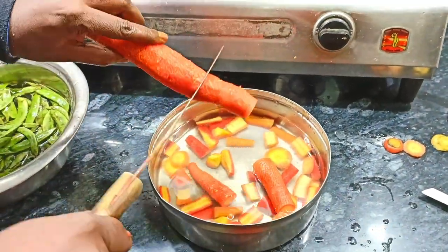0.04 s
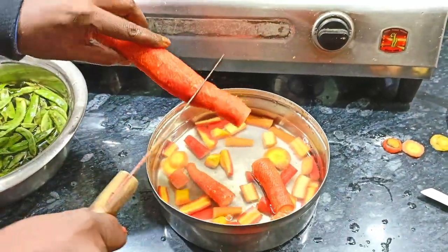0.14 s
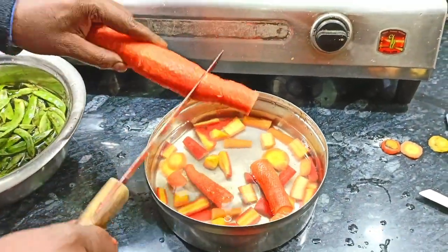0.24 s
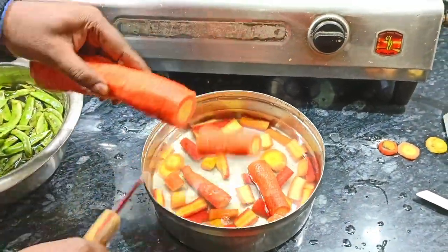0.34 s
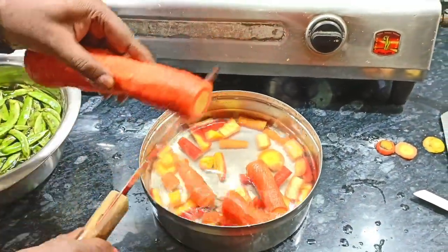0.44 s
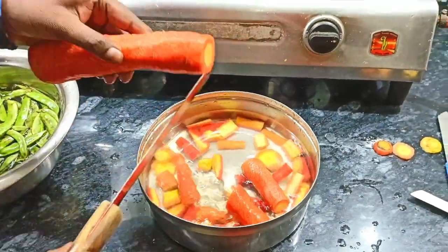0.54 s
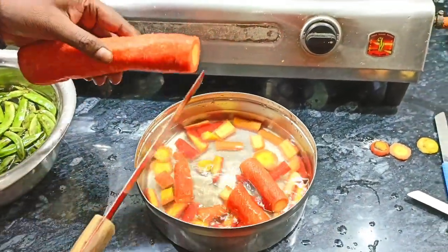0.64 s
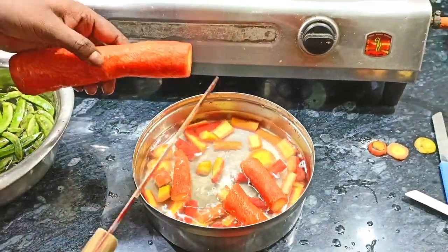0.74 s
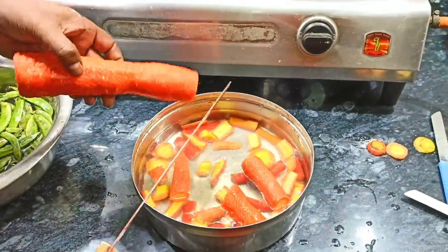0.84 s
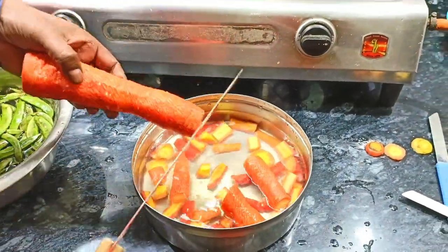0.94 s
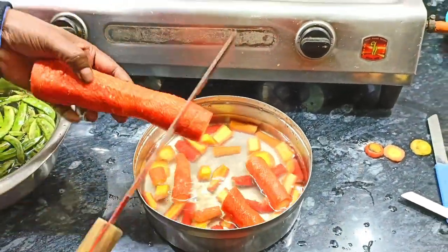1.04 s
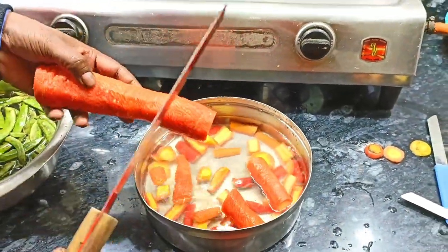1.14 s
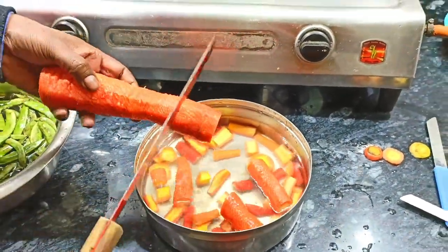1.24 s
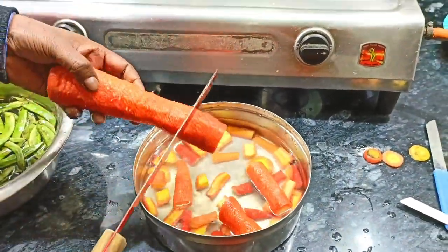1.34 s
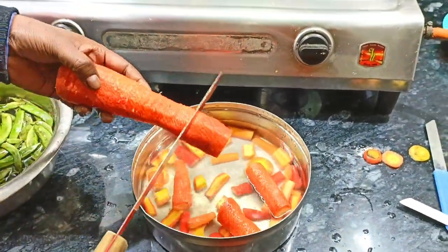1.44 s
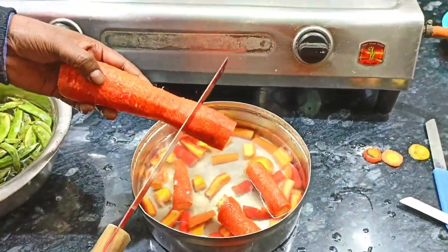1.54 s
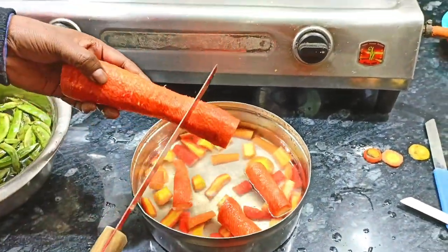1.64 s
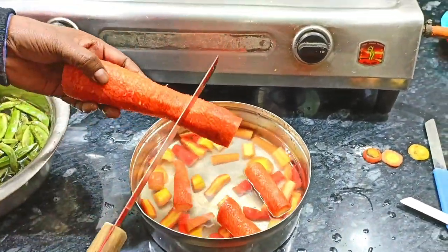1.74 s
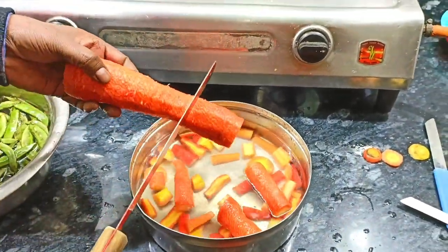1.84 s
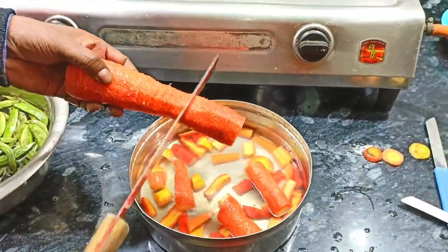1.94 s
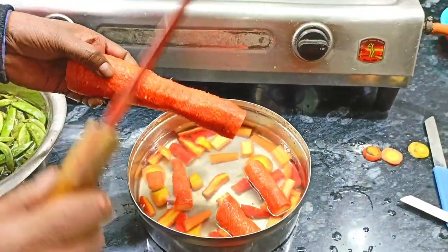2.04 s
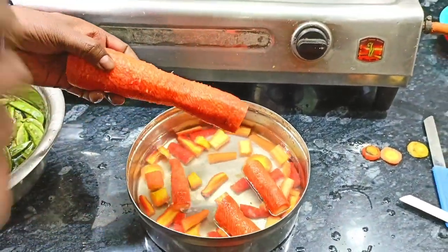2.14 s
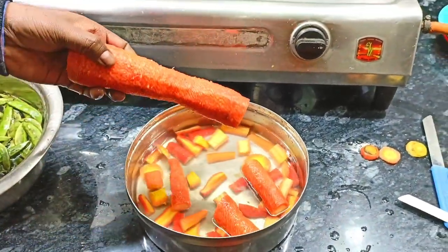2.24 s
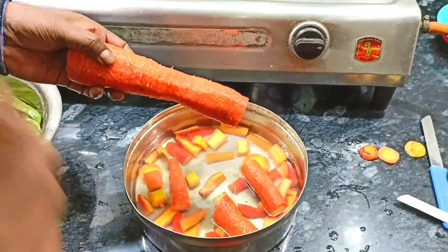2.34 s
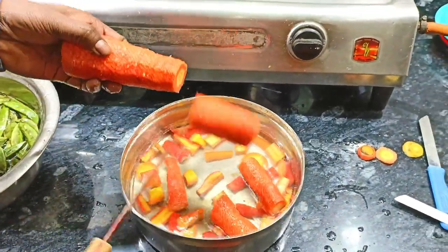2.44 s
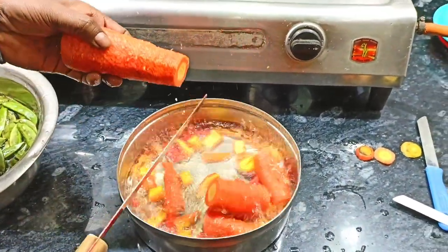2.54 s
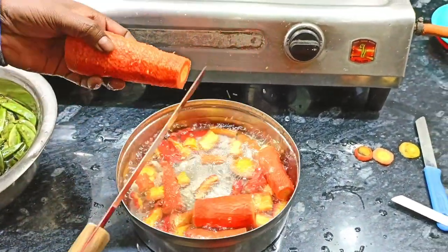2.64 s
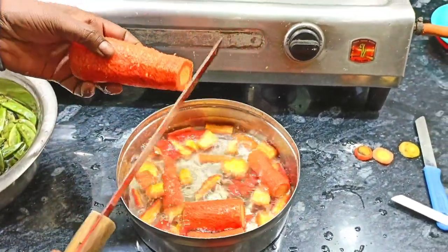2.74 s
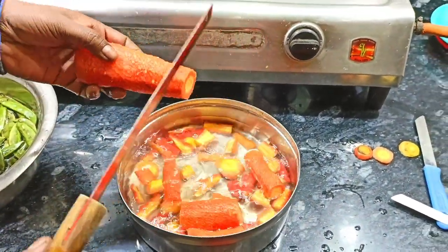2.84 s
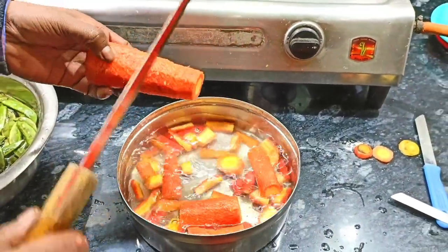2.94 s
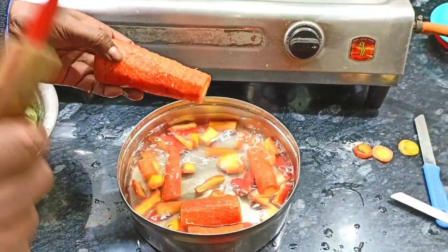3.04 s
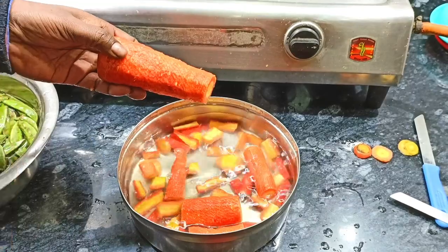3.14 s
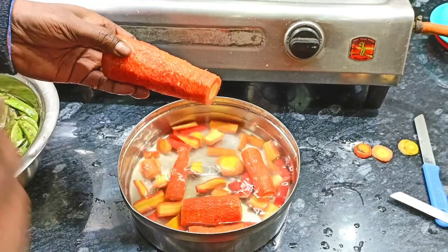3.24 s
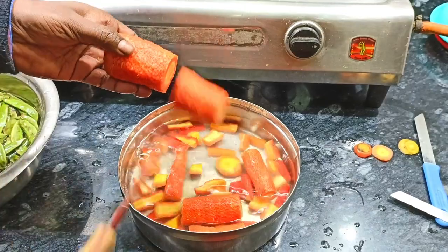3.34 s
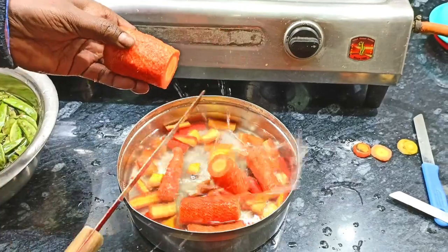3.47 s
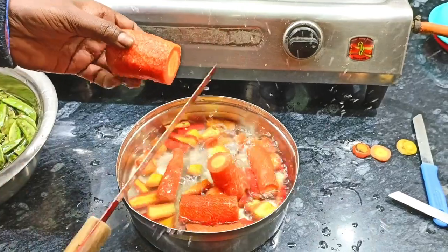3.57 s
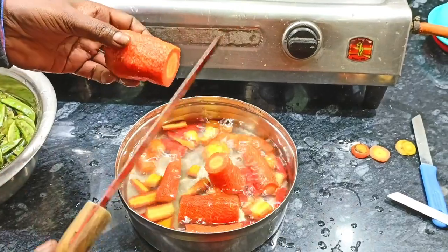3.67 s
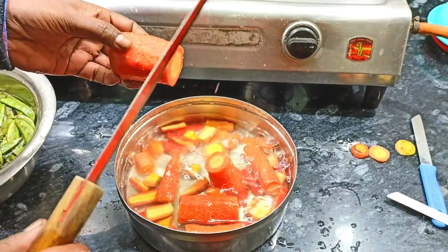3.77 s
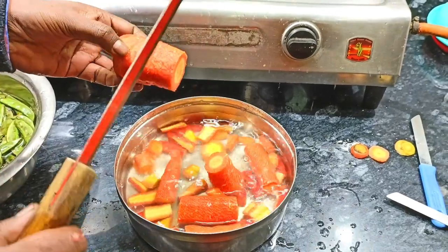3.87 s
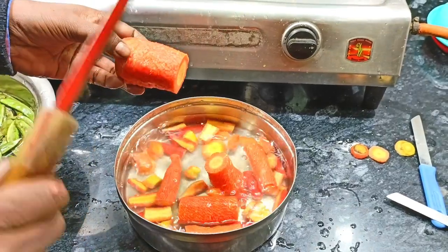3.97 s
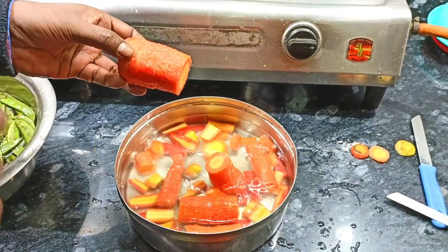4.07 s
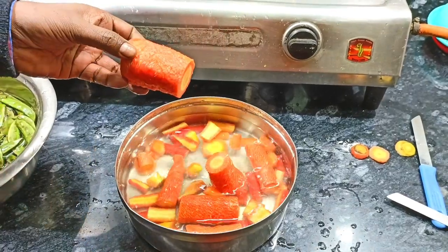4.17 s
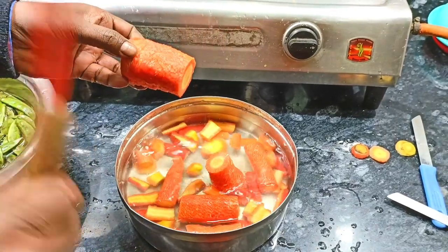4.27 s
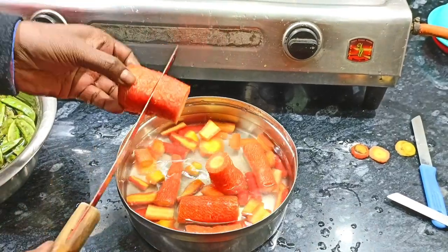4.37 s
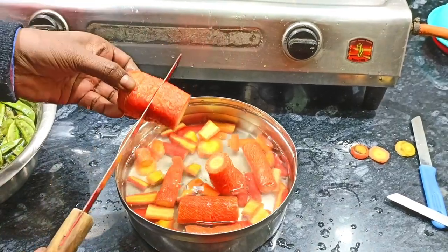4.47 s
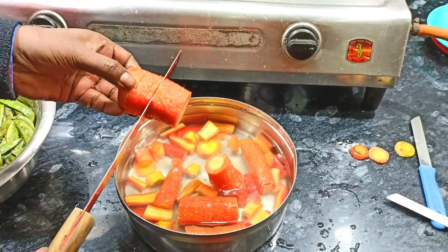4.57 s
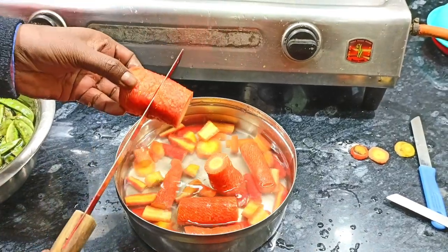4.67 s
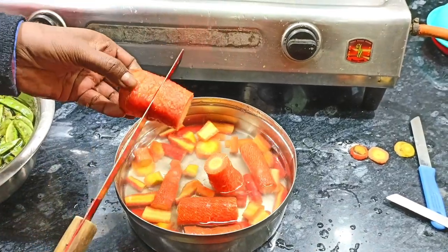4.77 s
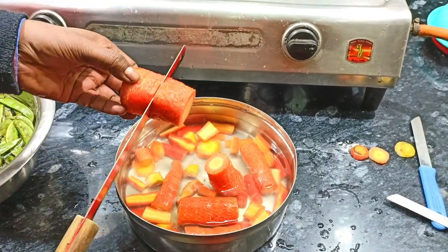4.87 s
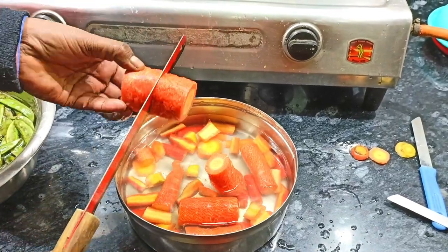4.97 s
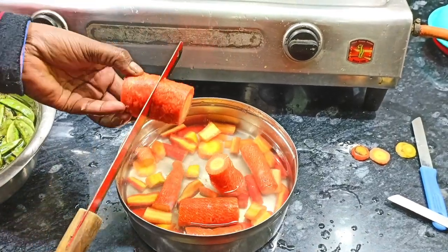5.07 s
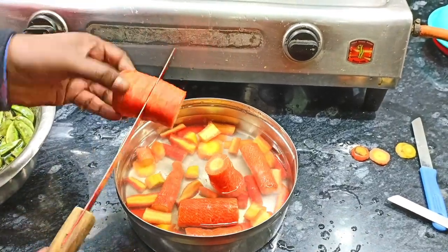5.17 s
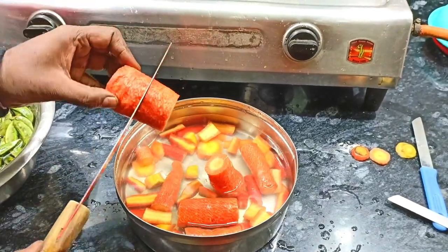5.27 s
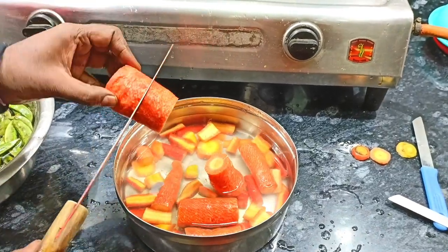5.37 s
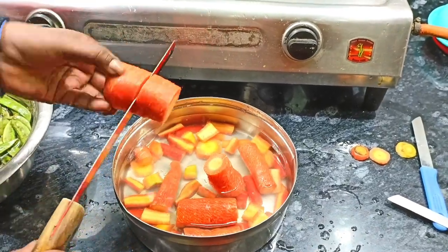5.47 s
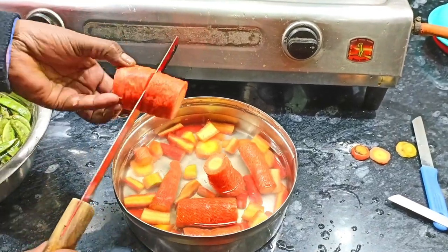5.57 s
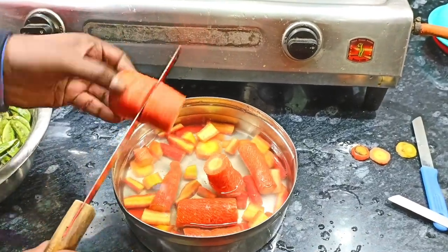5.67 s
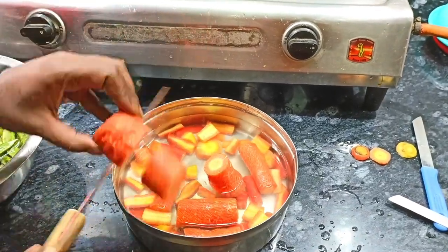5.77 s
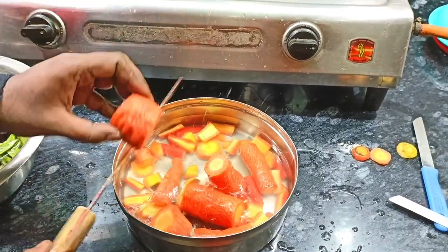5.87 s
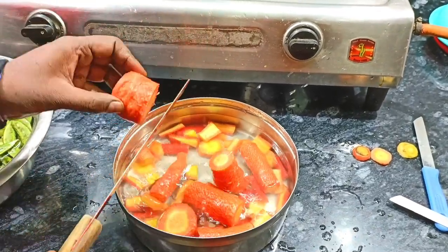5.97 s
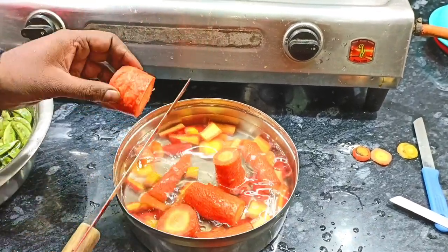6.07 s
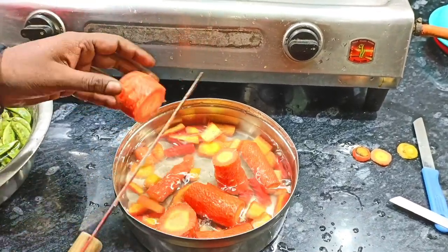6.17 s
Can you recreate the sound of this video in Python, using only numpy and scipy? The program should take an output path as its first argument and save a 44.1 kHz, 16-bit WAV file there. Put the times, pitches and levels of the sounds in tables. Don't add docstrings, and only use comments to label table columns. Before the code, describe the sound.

A knife cracks crisp chunks off a raw carrot; each thumps and plops into a water-filled steel bowl, which knocks and hums briefly.

```python
import sys
import numpy as np
from scipy import signal
from scipy.fft import rfft, irfft, next_fast_len
from scipy.io import wavfile

SR = 44100
rng = np.random.default_rng(int(sys.argv[2]) if len(sys.argv) > 2 else 0)


def voltage_ratio(decibels):
    exponent = np.asarray(decibels, float) / 20
    return 10 ** exponent


def persist_wave(psi):
    counts = np.round(np.clip(psi, -1, 1) * 32767).astype(np.int16)
    wavfile.write(sys.argv[1], SR, np.atleast_2d(counts).T)


N = 274026

# [Hz, dB per Hz]
FLESH_COLOUR = [(590, -12), (1000, -7.5), (1600, -7), (1990, -8), (2180, -9.5), (2960, -7.5), (3280, -9),
                (4820, -5), (6600, -24), (7900, -22), (8630, -30), (9400, -21), (11500, -16), (14600, -23),
                (15600, -24), (16200, -62)]


def rms_one(x):
    return x / np.sqrt(np.mean(x ** 2) + 1e-20)


def coloured(x, points):
    hz, level_db = np.transpose(points)
    grid = np.maximum(np.fft.rfftfreq(N, 1 / SR), 1)
    return irfft(rfft(x) * voltage_ratio(np.interp(np.log(grid), np.log(hz), level_db)), N)


def band(x, low_hz, high_hz):
    sos = signal.butter(4, [low_hz, high_hz], "band", fs=SR, output="sos")
    return rms_one(signal.sosfilt(sos, x))


def drift(rate_hz):
    r = np.exp(-2 * np.pi * rate_hz / SR)
    wander = signal.lfilter([1], [1, -2 * r, r * r], rng.standard_normal(N + SR))
    return rms_one(wander[SR:])


def grains(per_s, spread_db):
    sizes = voltage_ratio(spread_db * np.minimum(rng.exponential(1, N), 4)) * rng.choice([-1, 1], N)
    return rms_one(sizes * (rng.random(N) < per_s / SR))


def add(out, s, x):
    at = max(round(s * SR), 0)
    out[at:at + len(x)] += x[:N - at]


def ringing(x, hz, r, gains):
    return signal.lfilter(gains, [1, -2 * r * np.cos(2 * np.pi * hz / SR), r * r], x)


def resonances(x, modes, waver_db=0):
    out = 0
    for hz, width_hz, level_db in modes:
        note = rms_one(ringing(x, hz, np.exp(-np.pi * width_hz / SR), [1, 0, -1]))
        out = out + voltage_ratio(level_db + waver_db * drift(14.)) * note
    return rms_one(out)


def regions(x):
    edges_hz = [(3800, 6500), (2500, 3800), (900, 2500), (6500, 16500)]
    return [band(x, low, high) for low, high in edges_hz]


def swells(rows, bend):
    t, power = np.arange(0, N + 16, 16) / SR, 1e-12
    for s, peak_db, rise_ms, fall_ms in rows:
        away = 1000 * np.where(t < s, (s - t) / max(rise_ms, .1), (t - s) / max(fall_ms, 5))
        power = power + voltage_ratio(2 * (peak_db - 20 * away ** bend))
    return np.interp(np.arange(N) / SR, t, np.sqrt(power))


def struck(table, onset_s, level_db):
    out, t = np.zeros(N), np.arange(SR) / SR
    for s, peak_db, hz, t60_s, *beats in table:
        shape = (1 - np.exp(-t / onset_s)) * voltage_ratio(-60 * t / t60_s)
        if beats:
            shape = shape * np.cos(np.pi * beats[0] * (t - 2 * onset_s))
        add(out, s - onset_s, voltage_ratio(peak_db + level_db) * shape * np.sin(2 * np.pi * hz * t))
    return out


def crunch():
    # pitch_hz, width_hz, level_db
    blade_notes = [(1323, 87, 1), (1960, 130, -9), (3140, 170, 2), (3460, 300, 1), (4226, 82, -3.5),
                   (4800, 120, -3.5), (5270, 180, -5), (7200, 190, -20.5)]
    # pitch_hz, width_hz, level_db
    wedged_notes = [(755, 79, -23.5), (1340, 91.4, -6), (2260, 73, -3), (3035, 63, -6), (4600, 75, -11),
                    (4950, 150, -4), (5250, 90, -6), (5670, 110, -7), (6460, 100, -18.5), (7800, 150, -21)]
    grainy, middle_free_db, middle_wedged_db, drops_db = 0.45, -2.5, -11.0, -3
    rubbing = np.sqrt(1 - grainy) * rng.standard_normal(N)
    tearing = rubbing + np.sqrt(grainy) * grains(2500., 3.6)
    tearing = tearing * voltage_ratio(0.18 * drift(54.0))
    flesh, drops = mottled(coloured(tearing, FLESH_COLOUR)), droplets()

    steel = resonances(tearing, blade_notes, waver_db=4)
    free = regions(flesh + voltage_ratio(-5) * steel + voltage_ratio(drops_db) * drops)
    slips = tearing + .4 * grains(300., 3.0)
    steel = resonances(slips, wedged_notes, waver_db=4.5)
    stuck = regions(flesh + voltage_ratio(-2) * steel + voltage_ratio(drops_db - 2) * drops)

    wander = [voltage_ratio(1.8 * drift(20.0)) for _ in range(3)]
    free_gains = np.hypot(tear_gains(), rub_gains())
    out = 0
    for parts, middle_db, gains in [(free, middle_free_db, free_gains),
                                    (stuck, middle_wedged_db, saw_gains())]:
        main, dull, airy = gains
        out = out + main * parts[0]
        for gain, sway, part in zip([main * voltage_ratio(middle_db), dull, airy], wander, parts[1:]):
            out = out + gain * sway * part
    return out


def tear_gains():
    # start_s, peak_db, fall_ms (to lose 20 dB), dull_db and airy_db (relative to main)
    tears = [(0.29, -24, 181, -6.5, -15), (1.755, -74.5, 73.5, -20.5, -5), (2.337, -31.5, 12, -4, -4.5),
             (2.339, -41, 59, 2, -4), (2.359, -27.5, 208, 0, -14), (3.259, -39.5, 21, 0.5, 3),
             (3.262, -48.5, 267, -1.5, -2), (3.378, -52, 190, 4.5, -21), (3.5, -52.5, 123, -37, -28),
             (4.238, -36.5, 35, -8, -6), (4.242, -47, 169, -10, -8.5), (5.758, -48.5, 116, 5.5, -9.5),
             (5.817, -45.5, 110, -0.5, -22)]
    s, db, fall_ms, dull_db, airy_db = np.transpose(tears)
    return [swells(zip(s, db + rel_db, 0 * s, fall_ms * lingers), bend=1.554)
            for rel_db, lingers in [(0, 1), (dull_db, 1.147), (airy_db, 0.78)]]


def rub_gains():
    # peak_s, peak_db, rise_ms and fall_ms (for 20 dB), brightness_db
    rubs = [(.025, -57.5, 120, 67, 2.5), (.165, -55, 73, 316, 6), (.57, -61.5, 96, 150.5, -2.5),
            (.77, -65, 212, 177, -0.5), (.95, -83.5, 120, 199, -13), (1.17, -66.5, 130, 156.5, 3),
            (1.4, -92, 401, 401.5, 0), (1.56, -74, 149, 57.5, 3), (1.94, -54.5, 67, 287, 3),
            (2.11, -58, 220.5, 66, -9), (2.29, -46.5, 106, 105, 1.5), (2.89, -70.5, 69, 302, 0),
            (3.04, -61.5, 208, 75, -1), (3.205, -48.5, 69, 125, 0.5), (3.854, -65, 228, 305, 4),
            (4.02, -58.5, 215, 104, -3), (4.18, -51, 90, 205, 1), (6.05, -54.5, 150, 400, 4.5)]
    return friction_gains(rubs, dull_db=-3.5)


def saw_gains():
    # peak_s, peak_db, rise_ms and fall_ms (for 20 dB), brightness_db
    strokes = [(4.63, -75, 63, 199, -3), (4.75, -62.5, 135, 88.6, -2.5), (4.87, -64, 60, 145, 1),
               (5.05, -61.5, 20, 199, 1), (5.13, -52, 76, 99, 1), (5.24, -66.5, 30, 61.2, -4),
               (5.345, -71, 42, 80, 6.5), (5.4, -58, 64, 220, -1), (5.57, -61.5, 37, 148, 9),
               (5.635, -53.5, 126, 49.4, 2), (5.65, -44.5, 20, 56.3, 5.5), (5.7, -53.5, 33, 123, 1.5)]
    return friction_gains(strokes, dull_db=-9)


def friction_gains(rows, dull_db):
    gains = []
    for rel_db, slope in [(0, 0), (dull_db, -0.8), (-9.5, 1)]:
        part = [(s, db + rel_db + slope * bright_db, rise_ms, fall_ms)
                for s, db, rise_ms, fall_ms, bright_db in rows]
        gains.append(swells(part, bend=1.61))
    return gains


def mottled(x):
    depth_db, spacing_hz, top_hz = 4.5, 24.89, 11000
    hz = np.fft.rfftfreq(N, 1 / SR)
    heights = np.clip(rng.standard_normal(1500), -2, 1.2)
    ripple = np.interp(hz / spacing_hz, np.arange(1500), heights)
    return rms_one(irfft(rfft(x) * voltage_ratio(depth_db * ripple / (1 + (hz / top_hz) ** 4)), N))


def droplets():
    cycles = 110.
    clicks, dealt = grains(500., 3.0) + 1e-18, rng.integers(0, 24, N)
    out = 0
    for k, hz in enumerate(np.geomspace(1100, 6200, 24)):
        r = voltage_ratio(-60 * hz / (cycles * SR))
        own = clicks * (dealt == k) + 1e-18
        out = out + np.sqrt(hz) * ringing(own, hz, r, [0, np.sin(2 * np.pi * hz / SR)])
    return rms_one(out)


def snaps():
    # start_s, peak_db, pitch_hz, dull_db and airy_db (relative)
    cracks = [(0.2405, -34, 6000, -20, 10.5), (.291, -9.5, 4380, 0, -24), (.299, -8.5, 4380, -21, -27.5),
              (0.33, -8.5, 3630, 10, -25), (.341, -11.5, 4800, -17, -9), (2.341, -33, 4180, -5, -11),
              (2.3585, -6.5, 4040, -19, -22.5), (2.364, -16, 3700, -23, -23.5),
              (2.382, -11.5, 4280, -6, -23), (2.46, -18.5, 4100, -5, -24), (3.261, -28, 4280, -14, 4),
              (3.373, -32.5, 4200, -2, 11), (3.378, -34, 1600, 15, -25), (3.481, -40.5, 2260, -18, -40),
              (3.4889, -23, 3300, -35.5, -38), (4.2409, -18.5, 3780, -15.5, 7.5),
              (5.8168, -22.5, 3190, -19, -29), (5.8195, -22, 2790, -21, -29), (5.831, -32, 2960, -23, -23),
              (5.8624, -37, 2700, 11, -20)]
    # start_s, peak_db, pitch_hz, airy_db (relative)
    ticks = [
        (4.877, -52, 4870, -24.5),
        (4.8904, -44.5, 4930, -15.5),
        (5.0421, -49, 4840, -8.5),
        (5.236, -60, 5700, -15),
        (5.3868, -44, 5050, -18),
        (5.5649, -40, 5500, 14),
        (5.637, -45, 4700, -7),
        (5.6493, -30.5, 5340, 12),
        (5.654, -29, 4960, 9),
        (5.66, -40, 4600, -14),
    ]
    crack_s, tick_s, tick_dull_db = 0.013, 0.018, -21
    ring_db, burst_db = -1.5, -15.5
    out, t = np.zeros(N), np.arange(SR // 20) / SR
    main, middle, dull, airy = regions(coloured(rng.standard_normal(N), FLESH_COLOUR))
    rows = [(*crack, crack_s) for crack in cracks]
    rows += [(s, db, hz, tick_dull_db, airy_db, tick_s) for s, db, hz, airy_db in ticks]
    for s, peak_db, hz, dull_db, airy_db, length_s in rows:
        part = slice(round(s * SR), round(s * SR) + len(t))
        noise = main[part] + middle[part] + voltage_ratio(dull_db) * dull[part] + voltage_ratio(airy_db) * airy[part]
        burst = noise * voltage_ratio(-60 * t / (0.64 * length_s))
        note = np.sin(2 * np.pi * hz * t) * voltage_ratio(-60 * t / length_s) * np.minimum(t / .0004, 1)
        spike = 1 + voltage_ratio(1 - 60 * t / .004)
        add(out, s, voltage_ratio(peak_db) * (voltage_ratio(burst_db) * burst + voltage_ratio(ring_db) * note * spike))
    return out


def splash():
    # [Hz, dB per Hz]
    water_colour = [(35, -58), (60, -31.5), (119, -4), (166, -5.5), (243, -5), (292, -11.5), (370, 1.5),
                    (422, -12.5), (826, 0.5), (1400, -17.5), (1820, -49.5), (3080, -120)]
    # pitch_hz, width_hz, level_db
    bowl_notes = [(123, 14, -6), (242, 82, -2), (366, 140, -5), (578, 83, 4), (770, 110, 7),
                  (844.4, 12, -4.5), (980, 48, -11.5), (1055, 11, -2)]
    push = rng.standard_normal(N) + .5 * grains(300., 2.5)
    push = push * voltage_ratio(1.2 * drift(35.))
    water = rms_one(coloured(push, water_colour)) + voltage_ratio(6.) * resonances(push, bowl_notes)
    boom = fall_gain(0, swell_db=14.5, leads=0.77, lingers=0.88)
    slosh = fall_gain(1, swell_db=5.5, leads=0.66, lingers=0.7)
    return boom * band(water, 80, 420) + slosh * band(water, 420, 1200)


def fall_gain(slosh, swell_db, leads, lingers):
    # start_s, boom_db, swell_ms, fall_ms (to lose 20 dB), slosh_db (relative to boom)
    falls = [(0, -52.5, 8.1, 153, -8.5), (0.295, -31, 118, 264, 0), (.14, -66, 80, 76.5, 6),
             (1.92, -75.5, 340, 302, 13), (2.336, -42, 4.8, 67.5, 5), (2.36, -27.5, 180, 290, 2),
             (3.259, -55, 110, 103, 6.5), (3.376, -34, 47, 208.5, -1.5), (3.9, -80.5, 190, 303.5, 16),
             (4.24, -53.5, 1.8, 105.5, -10), (5.05, -77.5, 47, 202, 8.5), (5.764, -32.5, 60, 270, -3),
             (5.95, -72.5, 250, 398.5, 11.5)]
    t, power = np.arange(0, N + 16, 16) / SR, 1e-12
    for s, boom_db, swell_ms, fall_ms, slosh_db in falls:
        top = s + max(swell_ms * leads, 1) / 1000
        dies_s = max(fall_ms * lingers, 10) / 1000
        rising_db = swell_db * (top - t) / (top - s)
        dying_db = 20 * (np.maximum(t - top, 0) / dies_s) ** 1.27
        loss_db = np.where(t < top, rising_db, dying_db)
        power = power + (t >= s) * voltage_ratio(2 * (boom_db + slosh * slosh_db - loss_db))
    return np.interp(np.arange(N) / SR, t, np.sqrt(power))


def knocks():
    # start_s, peak_db, pitch_hz
    hits = [(0.306, -7, 980), (0.315, -12.5, 264), (0.335, -12, 1310), (0.363, -5.5, 770),
            (2.363, -10, 850), (2.378, -12, 520), (2.41, -12, 960), (2.54, -14, 820), (2.433, -6, 307),
            (2.434, -10, 790), (2.442, -11, 690), (2.464, -2, 830), (2.487, -12, 220), (2.4, -16, 200),
            (2.469, -19, 582), (2.489, -20.5, 369), (3.261, -20, 1000), (3.382, -9.5, 737),
            (3.396, -11.5, 613), (3.409, -28, 783), (3.429, -15, 760), (3.442, -20, 770), (4.243, -29, 267),
            (5.767, -15, 600), (5.8, -17, 590), (5.785, -7, 228), (5.839, -27, 366), (5.884, -10.5, 310)]
    return struck([(*hit, .03) for hit in hits], onset_s=0.0011, level_db=-11.0)


def singing_bowl():
    # start_s, peak_db, pitch_hz, t60_s, beats_per_s
    bowl_tails = [(.008, -50, 560, .35, 4), (.008, -54, 830, .3, 6), (.42, -38, 124, .25, 8),
                  (0.465, -38, 124, .95, 11.3), (0.385, -36, 368, .8, 11.5), (0.49, -42, 555, .8, 10.5),
                  (2.375, -36, 128, .2, 8), (2.428, -32, 123, 1.25, 12), (2.46, -31, 372, .6, 3),
                  (2.45, -32, 243, .4, 12), (2.65, -38, 243, .4, 5), (2.7, -50, 560, .15, 8),
                  (2.81, -55, 548, .9, 2.5), (3.67, -56, 120, .4, 8), (3.62, -53, 348, 1.1, 2),
                  (5.805, -30, 124, .9, 12.5)]
    return struck(bowl_tails, onset_s=0.00825, level_db=2.5)


def hums():
    # start_s, length_s, pitch_hz, first_db, last_db
    held_notes = [(.288, .045, 842, -21, -22), (.43, .155, 995, -37, -43), (.59, .105, 995, -53, -60.5),
                  (.415, .225, 768, -35, -52), (.655, .08, 785, -59, -63), (.74, .07, 775, -66, -68),
                  (5.88, .1, 765, -47, -53), (2.63, .08, 725, -45, -54), (5.84, .05, 360, -31, -34),
                  (0, .17, 130, -43, -60), (0, .08, 410, -54, -60), (3.375, .22, 765, -36, -58),
                  (3.39, .2, 124, -37, -41), (3.5, .085, 358, -43, -45), (3.615, .09, 745, -60, -66),
                  (5.762, .09, 855, -36, -41), (2.5, .035, 580, -34, -34), (2.6, .055, 560, -41, -45),
                  (2.74, .045, 560, -50, -52)]
    out, flutter = np.zeros(N), voltage_ratio(2.5 * drift(18.))
    for s, length_s, hz, first_db, last_db in held_notes:
        t = np.arange(round(length_s * SR)) / SR
        level = voltage_ratio(first_db + (last_db - first_db) * t / length_s)
        add(out, s, signal.windows.tukey(len(t), .3) * level * np.sin(2 * np.pi * hz * t))
    return out * flutter


def squeaks():
    # start_s, length_s, top_hz, last_hz, level_db
    arches = [
        (4.165, .063, 3100, 2400, -43),
    ]
    # start_s, length_s, first_hz, last_hz,
    # level_db
    glides = [(.262, .028, 5400, 5400, -36), (.279, .012, 850, 860, -46), (.277, .014, 1700, 1950, -56),
              (.82, .1, 1400, 1400, -72), (.83, .08, 2350, 2350, -75), (2.185, .02, 700, 900, -55),
              (2.2, .06, 900, 3000, -57), (2.22, .05, 2400, 3600, -56), (2.255, .02, 3450, 3900, -48),
              (2.28, .033, 4280, 4400, -41), (2.308, .019, 4300, 3050, -44), (2.283, .03, 2900, 3250, -46),
              (2.308, .018, 3250, 3050, -47), (2.265, .045, 1900, 2450, -50),
              (2.322, .036, 4050, 4200, -38), (3.15, .018, 1480, 1600, -52), (3.165, .03, 1600, 1900, -59),
              (3.2, .031, 3400, 3950, -47), (3.228, .016, 3800, 3550, -50), (3.237, .021, 3550, 2100, -41),
              (3.178, .024, 3450, 4150, -53), (3.225, .015, 2600, 2380, -53),
              (3.237, .019, 2800, 2150, -48), (3.479, .007, 2100, 2400, -39),
              (3.488, .011, 3050, 4200, -40), (3.5, .07, 9000, 8300, -70), (3.55, .07, 8500, 7900, -80),
              (4.234, .048, 1050, 1180, -49), (4.262, .018, 1450, 1500, -50),
              (5.322, .043, 5550, 5600, -65), (5.92, .095, 350, 358, -43), (2.255, .02, 720, 740, -54),
              (2.268, .018, 3900, 4000, -40), (2.205, .03, 1500, 2400, -55)]
    arch_from, top_at = .8, .55
    wobble, flutter_db = .008, 4.
    out, unsteady, flutter = np.zeros(N), drift(150.), drift(80.)
    for arched, rows in [(True, arches), (False, glides)]:
        for s, length_s, hz, last_hz, level_db in rows:
            at = np.arange(round(s * SR), round((s + length_s) * SR))
            u = np.linspace(0, 1, len(at))
            pitch = hz + (last_hz - hz) * u
            if arched:
                climb = hz * (1 - (1 - arch_from) * (1 - u / top_at) ** 2)
                sag = hz + (last_hz - hz) * ((u - top_at) / (1 - top_at)) ** 2
                pitch = np.where(u < top_at, climb, sag)
            shape_db = np.interp(u, [0, .5, 1], [-10, 0, -1])
            level = voltage_ratio(level_db + shape_db + flutter_db * flutter[at])
            phase = 2 * np.pi * np.cumsum(pitch * (1 + wobble * unsteady[at])) / SR
            out[at] += signal.windows.tukey(len(at), .2) * level * np.sin(phase)
    return out


def pings():
    # start_s, peak_db, pitch_hz, t60_s
    touches = [(1.214, -64.5, 5460, 0.043), (1.216, -67, 4060, 0.21), (1.5, -79, 4200, 0.027),
               (1.553, -70.5, 5000, 0.04), (1.553, -71, 10440, 0.047), (1.553, -83.5, 9500, 0.21),
               (1.553, -77, 7000, .03), (1.755, -52, 4890, 0.029), (1.755, -70.5, 6970, 0.028),
               (1.755, -73, 8000, 0.021), (1.755, -71, 11100, .05), (1.766, -64, 4800, 0.065),
               (2.36, -33, 7790, 0.024), (2.383, -33, 7790, .03), (2.39, -33, 8000, 0.026),
               (2.436, -34, 4800, .015), (2.455, -36, 7700, 0.011), (5.138, -52, 5450, .06),
               (5.39, -57, 4500, .08), (5.41, -60, 2400, .12), (2.49, -30, 3670, .015),
               (4.245, -37, 3350, 0.044), (4.243, -30.5, 2880, .02), (4.258, -47, 3760, .05),
               (4.29, -42.5, 3470, 0.11), (4.875, -56.5, 6470, 0.044), (4.875, -61.5, 2280, 0.09),
               (4.89, -64, 6470, 0.048), (5.1, -60.5, 11200, 0.044), (5.1, -59, 2160, 0.12),
               (5.105, -64, 746, 0.15), (5.12, -59, 1350, 0.14), (5.817, -31.5, 5100, 0.017),
               (5.817, -32, 4160, .015), (5.831, -42, 5050, 0.017)]
    return struck(touches, onset_s=.0006, level_db=2.0)


def spray():
    # start_s, peak_db, lowest_hz, highest_hz, t60_s
    bursts = [(.237, -45, 2600, 9000, 0.046), (2.454, -32, 5000, 8840, .015),
              (3.259, -39, 1500, 7000, 0.044), (3.3174, -43.5, 897, 7000, .015),
              (5.3883, -55.5, 2020, 7050, .03), (5.235, -61, 2970, 8000, 0.022),
              (.291, -54.5, 15000, 16280, .03), (1.214, -79, 8950, 14000, .04),
              (1.5, -80, 7050, 14000, 0.042), (1.553, -77.5, 8900, 14000, .04),
              (1.755, -67, 3530, 5400, 0.23), (1.199, -71.5, 3810, 4600, 0.29),
              (2.339, -53, 15000, 16400, .02), (2.359, -53.5, 15000, 16360, .03),
              (3.259, -54, 15000, 16400, .02), (3.5, -33, 3870, 7950, 0.016),
              (3.5, -50.5, 12600, 16000, .018), (3.503, -54.5, 5950, 8200, 0.23),
              (3.504, -69.5, 12000, 15500, .15), (4.239, -53, 14940, 16400, .02),
              (4.72, -71.5, 7640, 8300, 0.22)]
    out, t, white = np.zeros(N), np.arange(SR // 4) / SR, rng.standard_normal(SR // 4)
    for s, peak_db, low_hz, high_hz, t60_s in bursts:
        add(out, s, voltage_ratio(peak_db - 60 * t / t60_s) * band(white, low_hz, high_hz))
    return out


def kitchen(x):
    t60_s, level_db, wall_cut_hz = 0.5, -10, 1600
    size = next_fast_len(N + SR)
    w = 2 * np.pi * np.fft.rfftfreq(size)
    dull = 1 / (1 + (w * SR / (2 * np.pi * wall_cut_hz)) ** 2) ** 0.21
    echoes = 0
    for lag in (rng.uniform(.008, .03, 10) * SR).astype(int):
        loop = voltage_ratio(-60 * lag / SR / t60_s) * dull * np.exp(-1j * w * lag)
        echoes = echoes + loop / (1 - loop)
    return voltage_ratio(level_db) * irfft(rfft(x, size) * echoes, size)[:N]


def room_tone():
    # [Hz, dB per Hz]
    air_colour = [(12, -19), (30, -11), (75, -6), (120, -5.5), (173, -5), (223, -10), (263, -11.5),
                  (320, -12), (430, -15), (810, -18.5), (1100, -24.5), (2480, -28), (2700, -32),
                  (5300, -35.5), (6990, -51), (14900, -38), (16200, -55.5)]
    air = rms_one(coloured(rng.standard_normal(N), air_colour))
    return voltage_ratio(-67 + 0.79 * drift(2.4)) * air


def scene():
    sharp, knocking = snaps(), knocks()
    close = squeaks() + pings()
    echo = kitchen(sharp + voltage_ratio(-4.5) * knocking + voltage_ratio(-12) * close)
    cutting = crunch() + sharp + close + spray()
    bowl = splash() + knocking + singing_bowl() + hums()
    return (cutting + bowl + echo + room_tone())[None]


def low_pass(x):
    return signal.sosfilt(signal.butter(12, 16490, fs=SR, output="sos"), x)


def record(dry):
    thin = signal.sosfilt(signal.butter(2, 70., "high", fs=SR, output="sos"), dry)
    topless = signal.sosfilt(signal.cheby2(10, 60, 16900, fs=SR, output="sos"), thin)
    return low_pass(topless)


dry = scene()
out = record(dry)
persist_wave(out)
```